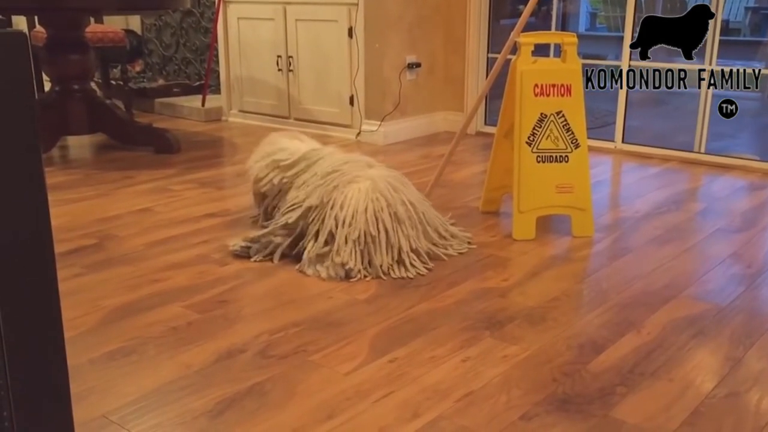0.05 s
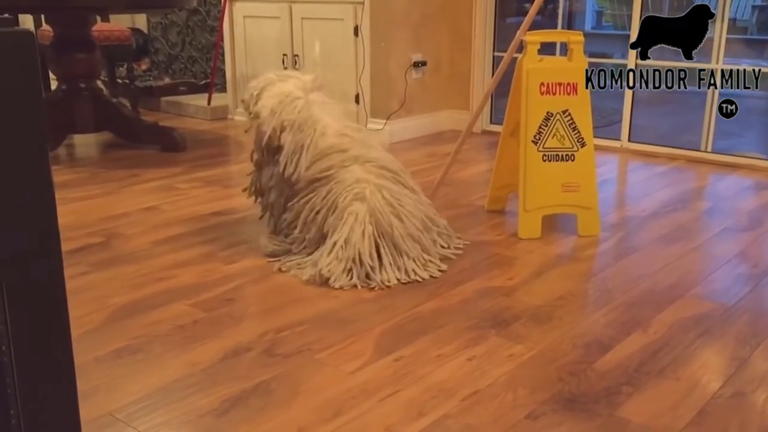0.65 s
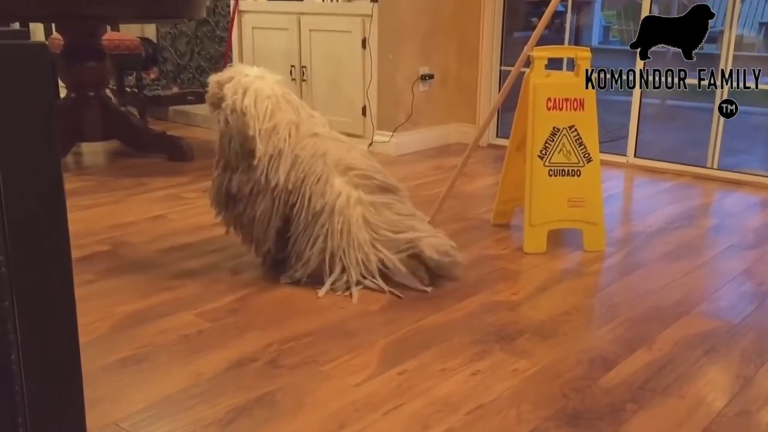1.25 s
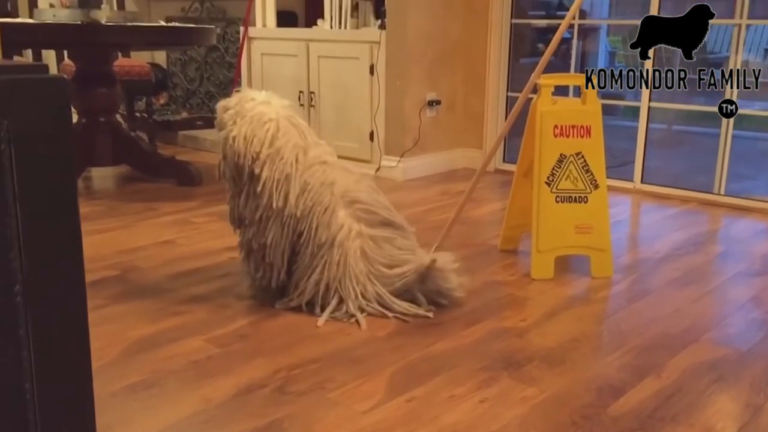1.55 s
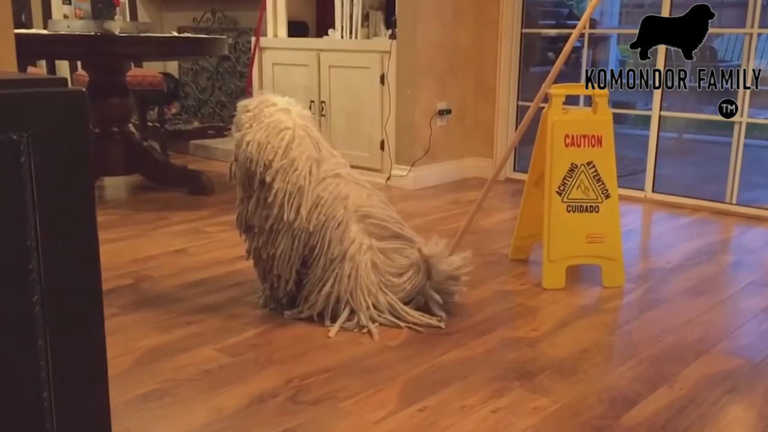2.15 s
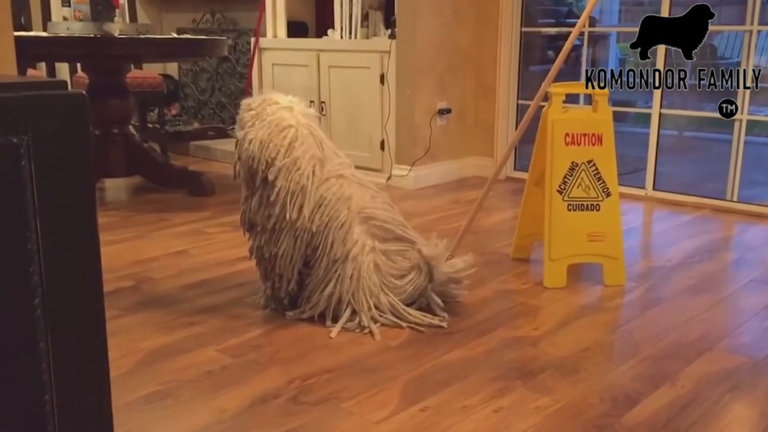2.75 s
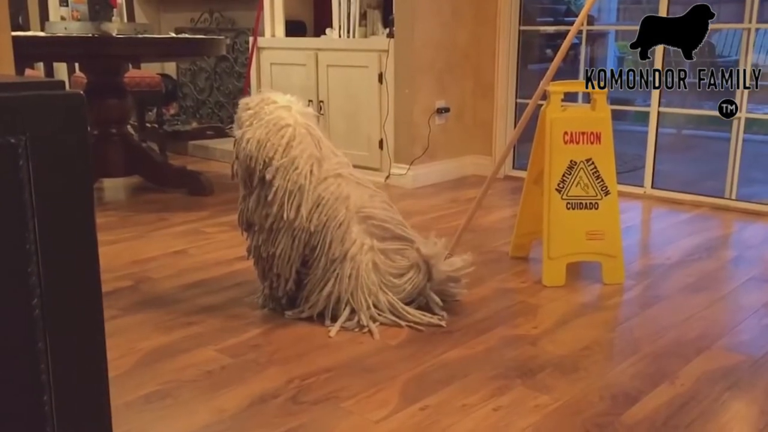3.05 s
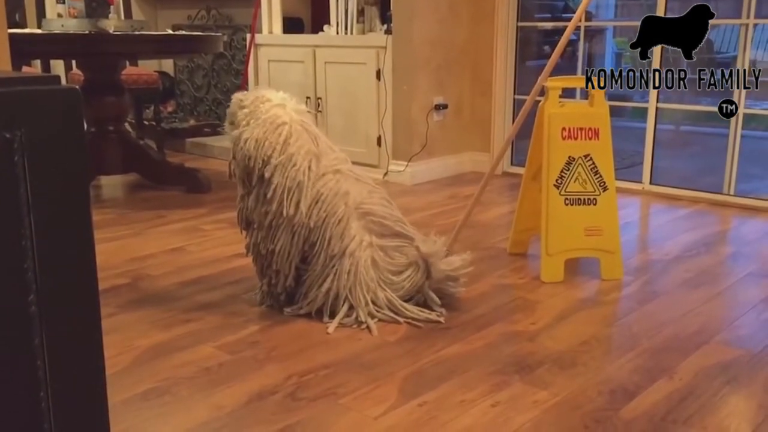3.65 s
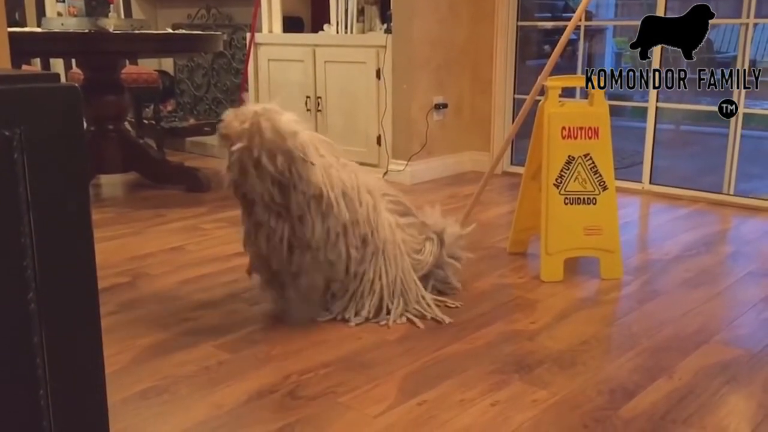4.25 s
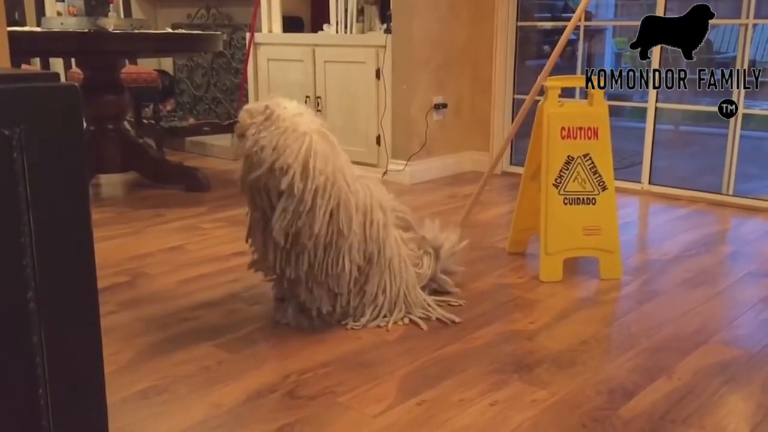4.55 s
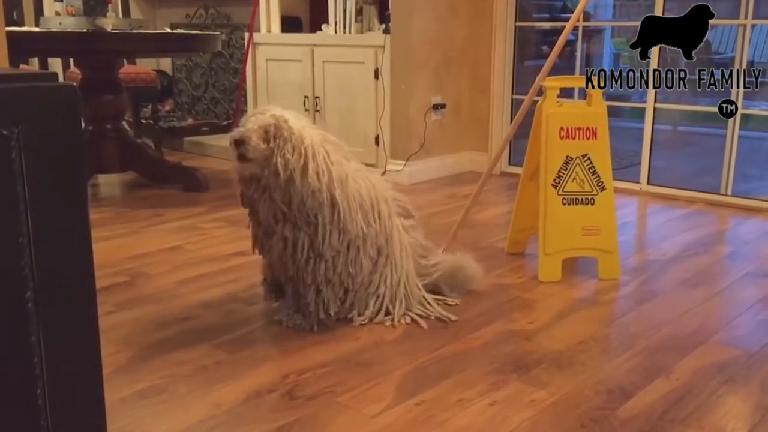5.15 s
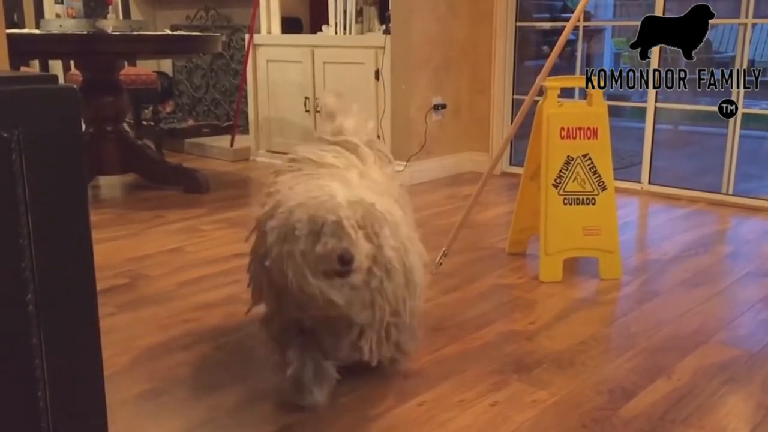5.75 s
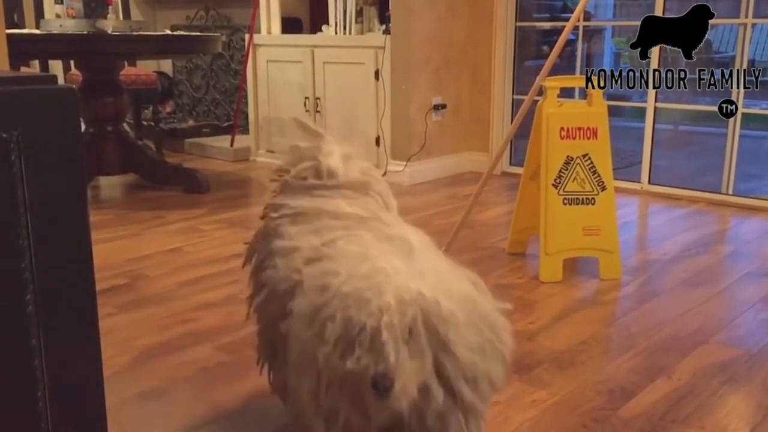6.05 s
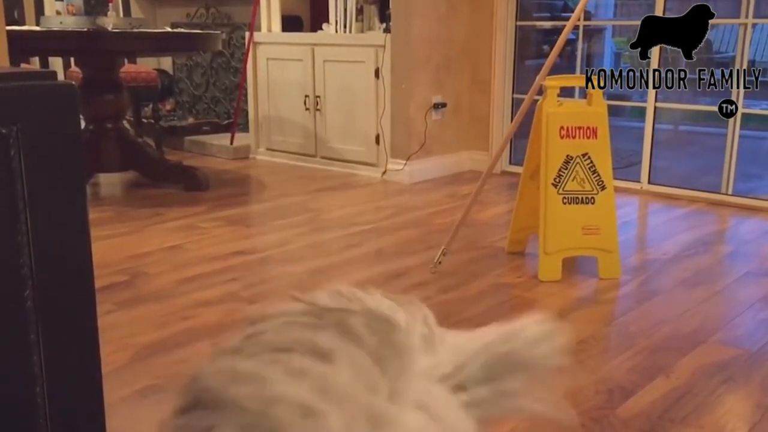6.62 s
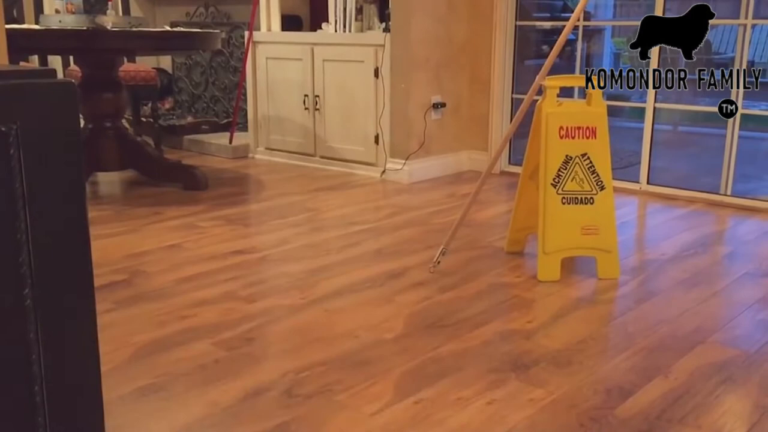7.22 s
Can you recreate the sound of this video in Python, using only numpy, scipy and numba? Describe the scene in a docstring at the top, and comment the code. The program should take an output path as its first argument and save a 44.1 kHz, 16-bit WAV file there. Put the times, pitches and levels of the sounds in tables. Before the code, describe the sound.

A big dog barks loudly four times indoors, grumbling softly in between, then scrambles up and trots across a wooden floor.

```python
"""A big dog with a corded coat barks four times in a live room with a wooden floor,
grumbling and woofing softly in between. Its voice is vocal-fold pulses and rough breath ringing
the jaw, tongue and muzzle. Something knocks on wood; the dog scrambles up and trots,
cords swishing, claws ticking and floorboards booming. A limiter holds the barks down,
and bursts of noise give their peaks the thump and rasp of overload."""
import sys
import numpy as np
from scipy import signal
from scipy.fft import rfft, irfft
from scipy.io import wavfile
from scipy.ndimage import uniform_filter1d, minimum_filter1d
from numba import njit

SR = 44100
rng = np.random.default_rng(int(sys.argv[2]) if len(sys.argv) > 2 else 0)


def wrap_up_sound(samples):
    """Save the sound to the file named by the first command line argument, as 16-bit audio."""
    columns = np.atleast_2d(samples).T
    # keep every value between -1 and 1, then stretch to whole-number steps
    tamed = np.clip(columns, -1, 1)
    steps = np.round(tamed * 32767).astype(np.int16)
    wavfile.write(sys.argv[1], SR, steps)


N = 329850
TIME = np.arange(N) / SR


def from_db(db):
    """Decibels to gain."""
    return 10 ** (np.asarray(db) / 20)


def rms_one(x):
    """Scale to unit rms."""
    return x / np.sqrt(np.mean(x ** 2) + 1e-20)


def at_hz(points, hz):
    """Read a table on a log-frequency axis."""
    points_hz, values = np.array(points).T
    return np.interp(np.log(hz + 1e-9), np.log(points_hz), values)


def noise(spectrum):
    """Unit noise of a given colour, falling away steeply beyond the table's ends."""
    hz = np.arange(N // 2 + 1) * SR / N + 1e-3
    roll_off = (1 + (spectrum[0][0] / hz) ** 6) * (1 + (hz / spectrum[-1][0]) ** 8)
    colour = from_db(at_hz(spectrum, hz)) / np.sqrt(roll_off)
    return rms_one(irfft(rfft(rng.standard_normal(N)) * colour, N))


def cut(x, hz, kind, order=2):
    """Butterworth low- or high-pass."""
    return signal.sosfilt(signal.butter(order, hz, kind, fs=SR, output="sos"), x + 1e-18)


def drift(rate_hz):
    """Smooth random wander of spread 1."""
    settle = SR // 10
    return rms_one(cut(rng.standard_normal(N + settle), rate_hz, "low")[settle:])


def decay(start, t60, rise_s=0.0012):
    """An envelope that leaps up and dies away."""
    age = np.clip(TIME - start, 0, 10 * t60)
    return np.tanh(age / rise_s) ** 2 * np.exp(-np.log(1000) * age / t60)


def swell(peak_s, half_s):
    """A bell-shaped envelope."""
    return np.exp(-0.5 * np.minimum(((TIME - peak_s) / half_s) ** 2, 100))


@njit
def resonate(x, hz, width):
    """A resonance of gain 1 whose centre may move from sample to sample."""
    r, y = np.exp(-np.pi * width / SR), np.zeros(len(x))
    for i in range(2, len(x)):
        drive = (1 - r * r) / 2 * (x[i] - x[i - 2])
        y[i] = drive + 2 * r * np.cos(2 * np.pi * hz[i] / SR) * y[i - 1] - r * r * y[i - 2]
    return y


def formant(x, hz, width):
    """A resonance applied twice, which keeps the valleys beside it dark."""
    centre = hz + np.zeros(len(x))
    return resonate(resonate(x, centre, float(width)), centre, float(width))


# The ring of the wood and its low end. Each row: frequency in Hz, noise density in dB.
WOOD_RING = [(88, -33.5), (150, -14), (303, -11.5), (449, -1.5), (701, -3.5), (846, -8), (1060, 1.5),
             (1390, -10.5), (1680, -10), (2060, -18), (2290, -15.5), (2960, -29), (9000, -61.5),
             (11700, -75), (19800, -120)]
WOOD_BASS = [(70, -14), (100, 3), (140, -2.5), (200, -4.5), (280, 1.5), (400, -7.5), (800, -38)]
# Knocks on wood. Each row: start in seconds, level in dB, contact cut-off in Hz, bass in dB.
KNOCKS = [(.006, -20, 620, -17.5), (0.034, -25.5, 800, -27.5), (.207, -33, 1500, -34.5),
          (1.094, -48, 1500, -35), (3.89, -49.5, 1230, -42), (4.597, -27.5, 1600, -35),
          (4.782, -22, 1580, -29.5), (4.972, -14.5, 2400, -29.5), (5.157, -19, 1500, -27.5),
          (5.177, -31, 1610, -43.5)]


def knocks(contact_s=0.003):
    """Each blow cracks faintly and sets a wooden panel ringing; a softer contact is duller."""
    panel, bass, crack = noise(WOOD_RING), noise(WOOD_BASS), from_db(-29) * noise(HARD_TICK)
    out = np.zeros(N)
    for start, db, contact_hz, bass_db in KNOCKS:
        ring = cut(panel * decay(start, t60=0.21, rise_s=contact_s), contact_hz, "low")
        snap = cut(crack * decay(start, t60=0.055, rise_s=contact_s), contact_hz, "low", order=1)
        thump = bass * decay(start, t60=0.25, rise_s=0.00079)
        out += from_db(db) * (ring + snap) + from_db(bass_db) * thump
    return out


# The boom of the floor. Each row: frequency in Hz, noise density in dB.
FLOOR_BOOM = [(18, -51), (30, -42.5), (61, -12), (145, 5), (162, -1), (184, -9.5), (267, -7.5), (367, -16),
              (450, -13.5), (580, -52), (990, -120)]


def floorboards(rise_s=0.036, rest_db=-80.5):
    """The floor booms under every step, knock and shift of weight, and rumbles faintly at rest."""
    steps = sum(from_db(db) * decay(start, t60=2.6, rise_s=rise_s) for start, *_, db in STEPS)
    blows = sum(from_db(db - 1) * decay(start, t60=0.31, rise_s=rise_s) for start, *_, db in KNOCKS)
    scuffs = sum(from_db(db - 13.5) * swell(peak, half) for peak, half, _, db in MOVES)
    return (steps + blows + scuffs + from_db(rest_db)) * noise(FLOOR_BOOM)


# The quiet of the room. Each row: frequency in Hz, noise density in dB.
ROOM_TONE = [(30, -20.5), (55, -14.5), (100, 2), (140, -6), (180, -15.5), (460, -12), (1700, -17),
             (5000, -25), (8000, -29), (14000, -40)]


def room_tone():
    """A faint, steady bed of dark noise."""
    return from_db(-74) * noise(ROOM_TONE)


# The colours of coat swish and paw scuff. Each row: frequency in Hz, noise density in dB.
COAT_SWISH = [(710, -46.5), (1200, -2), (2030, -2), (2430, -1), (2730, -2), (3650, 2), (6100, -1),
              (13800, -17), (15500, -25.5)]
PAW_SCUFF = [(120, -40), (200, -11.5), (362, -18.5), (527, 1), (620, -7), (929, -0.5), (1050, -8.5),
             (1660, -7), (1950, -13), (5000, -32), (6500, -59.5), (11000, -120)]
# The dog shifts its weight, sits up and scrambles to its feet.
# Each row: peak time in seconds, half width in seconds, coat swish in dB, paw scuff in dB.
MOVES = [(0.112, 0.27, -64.5, -65), (0.271, 0.045, -72, -44.5), (0.72, 0.041, -53.5, -50),
         (0.917, 0.049, -56, -55.5), (1.11, .038, -44, -34.5), (1.632, 0.031, -56.5, -51),
         (3.96, 0.067, -57.5, -42), (4.483, 0.092, -63, -55.5), (4.961, 0.65, -74.5, -57),
         (5.409, 0.027, -42.5, -25), (5.549, 0.1, -45, -30), (5.967, 0.099, -54.5, -45)]


def coat_and_scuffs(grain_db=3.0, grain_hz=180, swing_lag_s=0.055, swing_half_s=0.033):
    """Cords brush together and paws slide in grainy swells, at each move and just after each step."""
    swings = [(start + swing_lag_s, swing_half_s, db, db - 14) for start, _, _, db, _ in STEPS]
    swish = sum(from_db(db) * swell(peak, half) for peak, half, db, _ in MOVES + swings)
    scuff = sum(from_db(db) * swell(peak, half) for peak, half, _, db in MOVES + swings)
    cords = swish * noise(COAT_SWISH) * from_db(grain_db * drift(grain_hz))
    slides = scuff * noise(PAW_SCUFF) * from_db(grain_db * drift(grain_hz))
    return cords + slides


def gesture(row, onset_db, fade_db_per_s, release_db, scoop, scoop_s, onset_rough, release_rough,
            air_build_s, air_onset_db):
    """The curves of one call: effort leaps up, ebbs and lets go, hoarse at both ends."""
    start, attack_s, hold_s, release_s, peak_db, pitch_hz, fall, rough, tongue_hz, bright_db, air_db = row
    span = slice(int(start * SR), int((start + attack_s + hold_s + release_s) * SR))
    age = np.maximum(TIME[span] - start, 0)
    opening = np.clip(1 - age / attack_s, 0, 1) ** 2
    held_s = np.clip(age - attack_s, 0, hold_s)
    closing = np.clip((age - attack_s - hold_s) / release_s, 0, 1)
    unsettled = np.exp(-age / scoop_s)
    yelp, yelp_rough = (curve[span] for curve in yelps())
    bend = (1 - scoop * unsettled) * (1 - fall * closing)   # scoops up, finally falls
    pitch = pitch_hz * bend * (1 + yelp)
    jaw = 1.96 * pitch   # the jaw resonance rides near the second harmonic
    tongue = tongue_hz * bend * (1 + 0.7 * yelp)
    level_db = peak_db + onset_db * opening - fade_db_per_s * held_s + release_db * closing
    rough = np.clip(rough + onset_rough * unsettled + release_rough * closing + yelp_rough, 0, 1)
    air_db = air_db + air_onset_db * np.clip(1 - age / air_build_s, 0, 1) + release_db * closing
    surge = swell(start + 0.055, half_s=0.022)[span]   # around a bark's loudest moment
    return span, surge, pitch, level_db, rough, jaw, tongue, bright_db, air_db


# Air rushing past the teeth. Each row: frequency in Hz, noise density in dB.
TEETH_HISS = [(2500, -28.5), (3400, -8.5), (4300, -13), (5500, 2), (6900, 5.5), (8500, 0.5), (10000, -8),
              (12500, -13.5), (15000, -39)]
# Whistles in the gaps between the teeth. Each row: centre in Hz, width in Hz, level in dB.
TEETH_WHISTLES = [(3020, 55, -4), (3850, 43, -5), (4310, 120, -22.5), (6630, 240, -4.5), (7050, 70, -14.5),
                  (7430, 84, -13), (8300, 76, -12.5)]


def teeth_air(whistle_db):
    """Air forced past the teeth: a broad hiss with narrow whistles."""
    whistles = sum(from_db(db) * rms_one(formant(rng.standard_normal(N), hz, width))
                   for hz, width, db in TEETH_WHISTLES)
    return rms_one(noise(TEETH_HISS) + from_db(whistle_db) * whistles)


# Low thump and harsh rasp of overload as a bark peaks. Each row: frequency in Hz, noise density in dB.
OVERLOAD_THUMP = [(70, -23), (100, -6.5), (150, -3), (220, -7.5), (300, -1.5), (450, -0.5)]
OVERLOAD_RASP = [(2300, 2.5), (3000, -1), (4200, -4), (5200, -11), (5800, -19)]


def voice(calls, muzzle, jaw_width_hz, tongue_width_hz, tongue_db, hoarseness, low_cut_hz, thump_db,
          rasp_db, whistle_db, jitter=0.035, shimmer_db=4):
    """Uneven vocal-fold pulses and the turbulence they chop ring the throat; air hisses on top."""
    air, thump, rasp = teeth_air(whistle_db), noise(OVERLOAD_THUMP), noise(OVERLOAD_RASP)
    waver, flutter = drift(rate_hz=150), drift(rate_hz=150)
    breath = rms_one(cut(rng.standard_normal(N), 2200, "low"))
    out = np.zeros(N)
    for span, surge, pitch, level_db, rough, jaw, tongue, bright_db, air_db in calls:
        phase = 2 * np.pi * np.cumsum(pitch * (1 + jitter * rough * waver[span])) / SR
        pulses = rms_one(sum(np.cos(k * phase) for k in range(1, 15)))
        pulses *= from_db(shimmer_db * rough * flutter[span])
        turbulence = breath[span] * (1 + 2.6 * np.cos(phase))
        source = np.sqrt(1 - rough ** 2) * pulses + hoarseness * rough * turbulence
        upper = from_db(tongue_db) * formant(source, tongue, tongue_width_hz)
        upper += sum(from_db(db) * formant(source, hz, width) for hz, width, db in muzzle)
        throat = formant(source, jaw, jaw_width_hz) + from_db(bright_db) * upper
        throat = cut(throat, low_cut_hz, "high", order=4)
        throat /= np.sqrt(uniform_filter1d(throat ** 2, SR // 160) + 1e-12)   # evens out the level
        throat = cut(throat, 0.68 * low_cut_hz, "high", order=4)
        # overload rasp and thump swell with the surge; the rasp is stronger at higher pitch
        overload = from_db(rasp_db + 0.05 * (jaw - 751) + 6.5 * surge) * rasp[span]
        overload += from_db(thump_db) * surge * thump[span]
        call = from_db(level_db) * (throat + overload) + from_db(air_db) * air[span]
        out[span] += call * signal.windows.tukey(len(call), min(1, 0.012 * SR / len(call)))
    return out


# Upper resonances of the open muzzle. Each row: centre in Hz, width in Hz, level in dB.
OPEN_MUZZLE = [(1962, 150, -8.5), (2209, 87, -11), (2973, 260, -25)]
# Four barks; the third takes three rows, drawn out into a moan and a last push.
# Each row: start, attack, hold and release in seconds, level in dB, base pitch in Hz, final pitch
# fall from 0 to 1, roughness from 0 to 1, tongue resonance in Hz, brightness in dB, air hiss in dB.
BARKS = [(.303, .036, 0.11, 0.05, -6, 362.4, 0.14, 0.17, 1225, 1, -39.5),
         (1.144, 0.034, 0.1, 0.025, -2.5, 388.4, 0.43, 0.27, 1615, -3.5, -32.5),
         (3.987, 0.023, 0.089, 0.012, -8, 381.3, 0.27, 0.25, 1520, -1.5, -36),
         (4.108, 0.026, 0.12, 0.0078, -21, 363.4, 0.2, .3, 1270, -3.5, -47),
         (4.215, 0.033, 0.02, 0.033, -15, 396.2, 0.5, 0.05, 1520, -7, -52.5),
         (5.684, .013, 0.098, 0.038, -6, 387.7, 0.19, 0.11, 1615, -2.5, -29)]


def barks():
    """A bark bursts out of the open mouth and ebbs quickly."""
    calls = [gesture(row, onset_db=-22.5, fade_db_per_s=62, release_db=-9.5, scoop=0.17, scoop_s=0.02,
                     onset_rough=0.6, release_rough=0.5, air_build_s=0.053, air_onset_db=-7)
             for row in BARKS]
    return voice(calls, OPEN_MUZZLE, jaw_width_hz=230, tongue_width_hz=210, tongue_db=-5,
                 hoarseness=1.0, low_cut_hz=528, thump_db=-24, rasp_db=-34.5, whistle_db=-2.5)


# Upper resonances of the nearly closed muzzle. Each row: centre in Hz, width in Hz, level in dB.
CLOSED_MUZZLE = [(1575, 250, -6.5), (1685, 200, -13.5), (2280, 180, -17), (2974, 310, -24.5)]
# Grumbles and soft woofs. Each row reads like a row of BARKS.
GRUMBLES = [(0.739, 0.07, .27, .03, -38.5, 270.7, .02, .75, 929, 3, -71),
            (1.748, 0.074, 0.017, .06, -45.5, 297, .01, 0.13, 886, 4, -92),
            (2.275, 0.072, 0.043, 0.24, -35.5, 283.6, 0.0313, .25, 935, -2, -71.5),
            (3.455, .065, .045, 0.2, -34, 286.9, .06, 0.4, 936, -2, -72),
            (4.275, 0.025, 0.041, 0.047, -24.5, 261.6, 0.18, 0.62, 910, -31, -56.5),
            (5.36, 0.046, 0.092, 0.051, -33, 265.5, .03, 0.73, 868, -4.5, -71.5),
            (5.56, 0.061, 0.072, 0.022, -26.5, 256, 0.0088, 1, 856, -11, -64)]


def grumbles():
    """A grumble swells more slowly behind a nearly closed mouth and holds its level."""
    calls = [gesture(row, onset_db=-32, fade_db_per_s=3.5, release_db=-22.5, scoop=0.18, scoop_s=0.04,
                     onset_rough=0.16, release_rough=0.67, air_build_s=0.05, air_onset_db=-7.5)
             for row in GRUMBLES]
    return voice(calls, CLOSED_MUZZLE, jaw_width_hz=150, tongue_width_hz=96, tongue_db=5.5,
                 hoarseness=1.6, low_cut_hz=420, thump_db=-37, rasp_db=-39, whistle_db=-7)


# The voice cracks upward in mid-bark. Each row: peak time in seconds, half length in seconds,
# jump as a share of the pitch, added roughness from 0 to 1.
YELPS = [(4.02, .02, .44, 0.06), (5.729, .015, .38, 0.63)]


def yelps(flip_s=0.0021, arch=0.3635):
    """Pitch lift and roughness as the voice flips to a higher register, arches and flips back."""
    lift, roughness = 0, 0
    for peak, half, jump, rough in YELPS:
        away = np.abs(TIME - peak)
        flipped = np.clip((half - away) / flip_s + 0.5, 0, 1)
        lift += jump * flipped * (1 - arch * (away / half) ** 2)
        roughness += rough * flipped
    return lift, roughness


# The tick of a claw, also the crack of a knock. Each row: frequency in Hz, noise density in dB.
HARD_TICK = [(1180, -58), (2000, -35), (2750, -18), (3900, -27.5), (5310, -5), (7240, -7.5), (8110, -13.5),
             (10500, -23.5), (14000, -32)]
# The trot. Each row: start in seconds, then pad thud, claw tick, coat swish and floor boom in dB.
STEPS = [(6.228, -71, -37, -65.5, -64), (6.398, -52, -44, -57, -57), (6.637, -62, -58, -52, -61),
         (6.867, -47, -23.5, -52.5, -61), (7.094, -44.5, -28.5, -46, -58.5),
         (7.308, -43, -52, -50.5, -47.5)]


def paw_steps():
    """A soft pad thuds and a claw ticks on the floor."""
    pad, claw = rms_one(cut(noise(WOOD_RING), 700, "low")), noise(HARD_TICK)
    thuds = sum(from_db(db) * decay(start, t60=0.084) for start, db, *_ in STEPS)
    ticks = sum(from_db(db) * decay(start, t60=0.011) for start, _, db, *_ in STEPS)
    return thuds * pad + ticks * claw


# Pads rub on the varnish.
# Each row: peak time in seconds, half width in seconds, centre in Hz, bandwidth in Hz, level in dB.
PAD_RUBS = [(6.933, 0.012, 646, 146, -45.5), (7.214, 0.02, 770, 159, -51), (7.301, 0.013, 1760, 407, -41),
            (7.304, 0.028, 726, 300, -46.5)]


def pad_rubs():
    """A pad that slips gives a short hoarse squeak."""
    return sum(from_db(db) * swell(peak, half) * rms_one(formant(rng.standard_normal(N), hz, width))
               for peak, half, hz, width, db in PAD_RUBS)


# The room's reverb. Each row: frequency in Hz, time to fall 60 dB in seconds.
ROOM_T60 = [(100, 0.1), (300, 0.21), (700, 0.54), (1600, 0.66), (4000, 0.3), (8000, 0.39), (14000, 0.04)]
# Resonances that ring on in the room. Each row: centre in Hz, width in Hz, level in dB.
ROOM_MODES = [(160, 9.9, 2.5), (719, 33, 0), (779, 13, 2.5), (962, 18, -2.5), (1552, 11, 2), (2175, 30, 3),
              (2370, 24, 5.5), (3130, 10, 5.5)]


def room(x, build_s=0.001):
    """Dense reflections build up and die away, each band at its own pace; a few modes stand out."""
    age, edges_hz = TIME[:SR], np.geomspace(40, 16000, 14)
    white, hz = rfft(rng.standard_normal(SR)), np.arange(SR // 2 + 1)
    tail = np.zeros(SR)
    for low, high in zip(edges_hz, edges_hz[1:]):
        band = irfft(white * ((hz >= low) & (hz < high)), SR)
        t60 = at_hz(ROOM_T60, np.sqrt(low * high))
        fade = np.exp(-np.log(1000) * age / t60) * (1 - np.exp(-age / build_s))
        tail += rms_one(band * fade) * np.sqrt(2 * (high - low)) / SR
    modes = sum(from_db(db) * resonate(x, np.full(N, float(mode_hz)), float(width))
                for mode_hz, width, db in ROOM_MODES)
    return signal.fftconvolve(x, tail)[:N] + modes


def scene():
    """The dog and the knocks share one room; a little treble reverb widens a nearly mono image."""
    barking, grumbling, wood = barks(), grumbles(), knocks()
    body = coat_and_scuffs() + paw_steps() + pad_rubs()
    # Each row: layer, direct level in dB, reverb send in dB.
    mix = [(barking, -3.5, -6), (grumbling, -4, -3), (wood, -1.5, -4.5), (body, 0, -5)]
    direct = sum(from_db(db) * layer for layer, db, _ in mix)
    send = sum(from_db(db) * layer for layer, _, db in mix)
    mid = direct + room(send) + floorboards() + room_tone()
    side = from_db(-22) * cut(room(send), 1400, "high")
    return np.array([mid + side, mid - side])


def record(dry, ceiling_db=-1.9, release_db_per_s=170, quiet_db=-60, top_hz=15900):
    """A look-ahead limiter pins the barks, an expander shortens faint tails, and the top is cut."""
    peak_db = 20 * np.log10(np.abs(dry).max(axis=0) + 1e-9)
    over_db = np.maximum(peak_db - ceiling_db, 0)
    recovery_db = release_db_per_s * TIME
    held_db = np.maximum.accumulate(over_db + recovery_db) - recovery_db
    limit_db = uniform_filter1d(minimum_filter1d(-held_db, size=90), size=90)
    level_db = 10 * np.log10(np.abs(uniform_filter1d(dry[0] ** 2, SR // 25)) + 1e-12)
    expand_db = np.clip(level_db - quiet_db, -4, 0)
    top_cut = signal.cheby2(14, 70, top_hz, fs=SR, output="sos")
    return signal.sosfilt(top_cut, dry * from_db(limit_db + expand_db))


dry = scene()
out = record(dry)
wrap_up_sound(out)
```